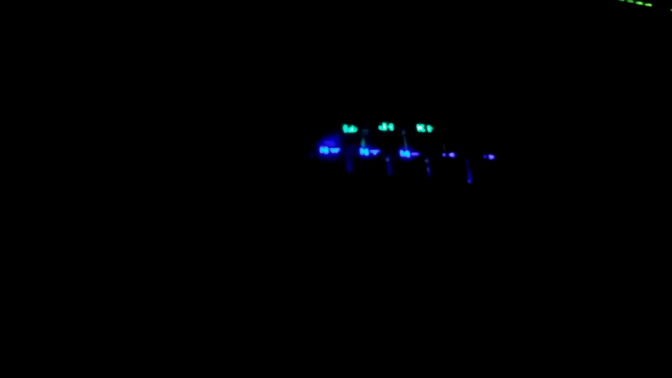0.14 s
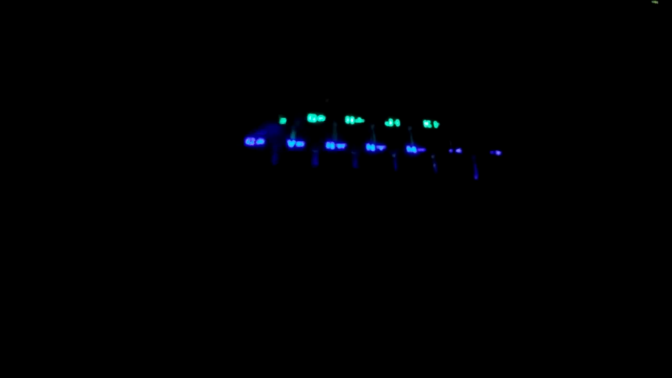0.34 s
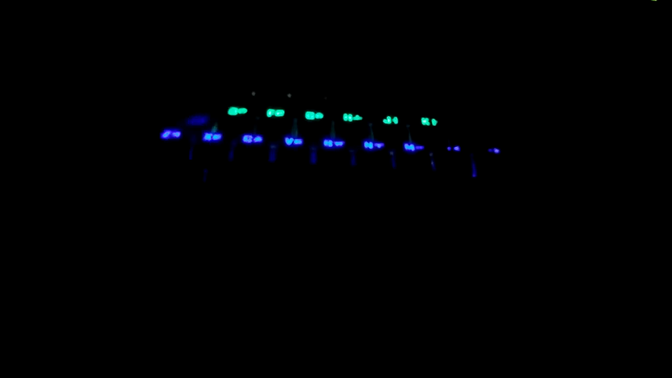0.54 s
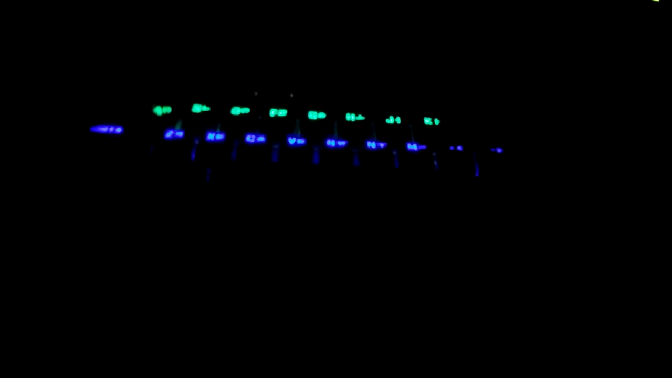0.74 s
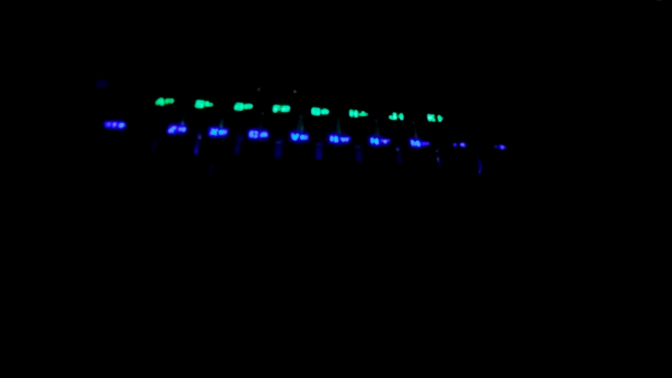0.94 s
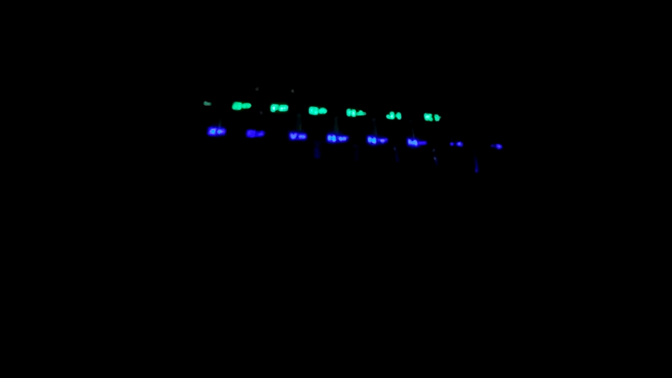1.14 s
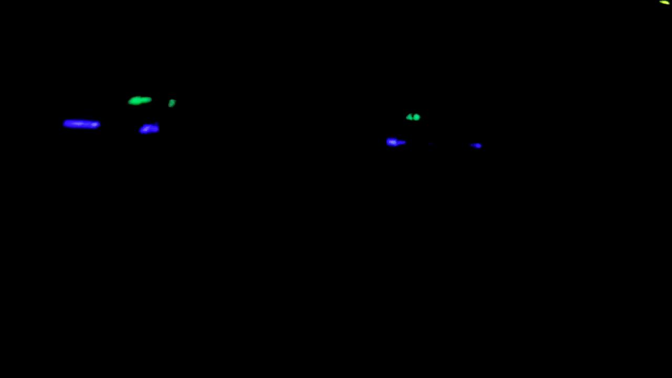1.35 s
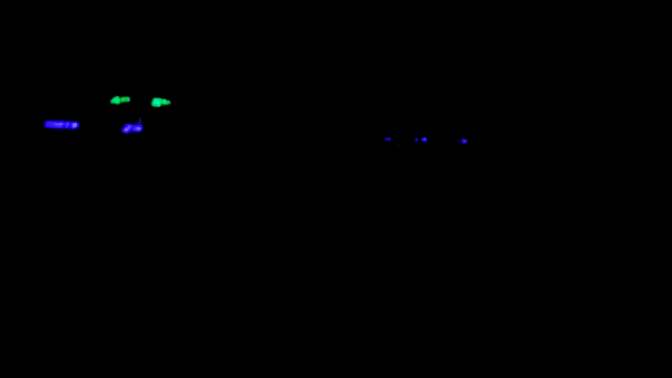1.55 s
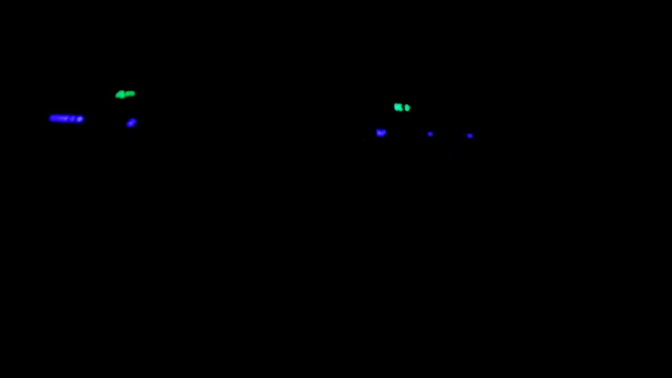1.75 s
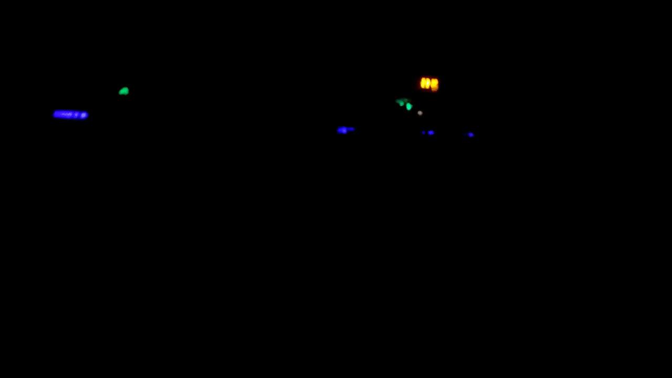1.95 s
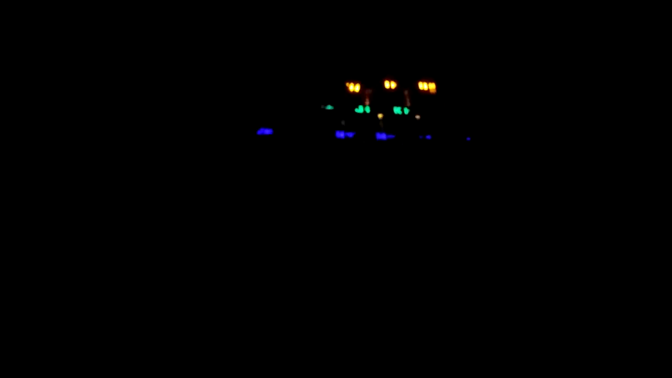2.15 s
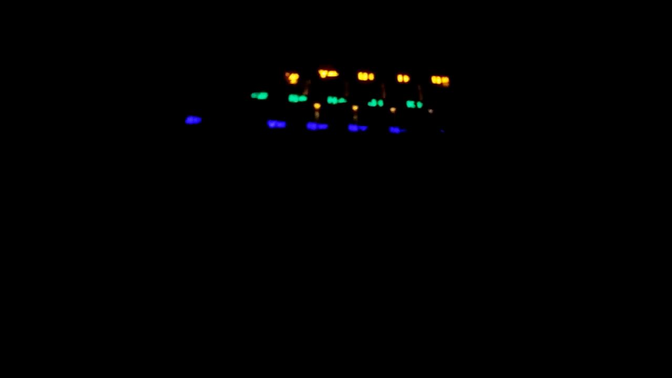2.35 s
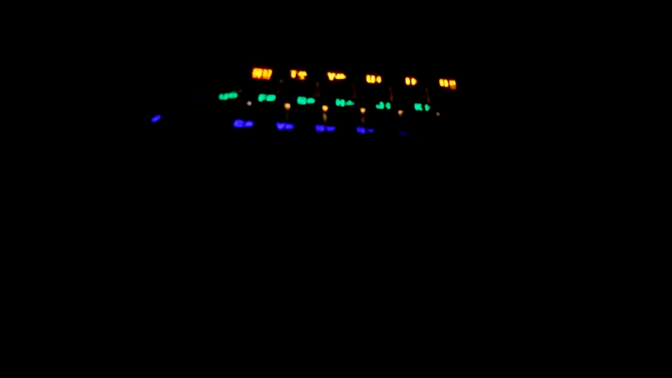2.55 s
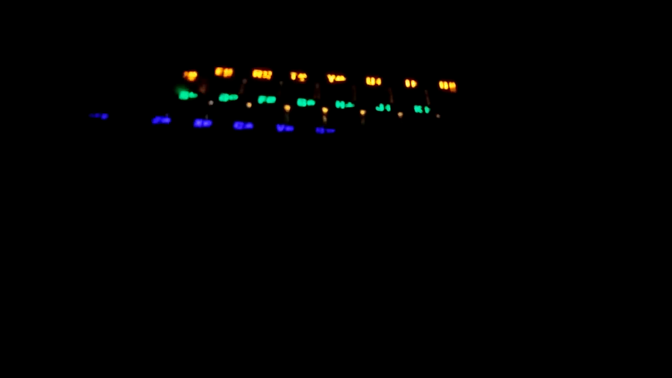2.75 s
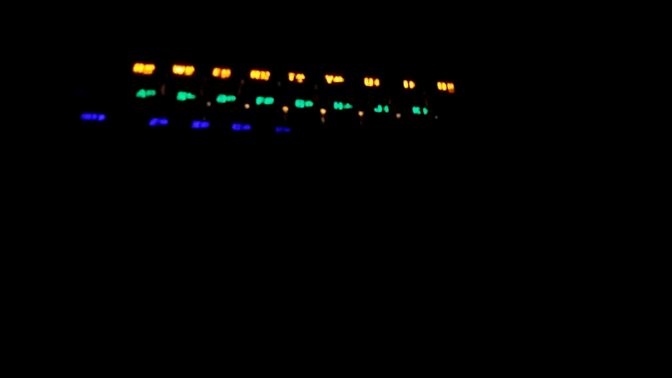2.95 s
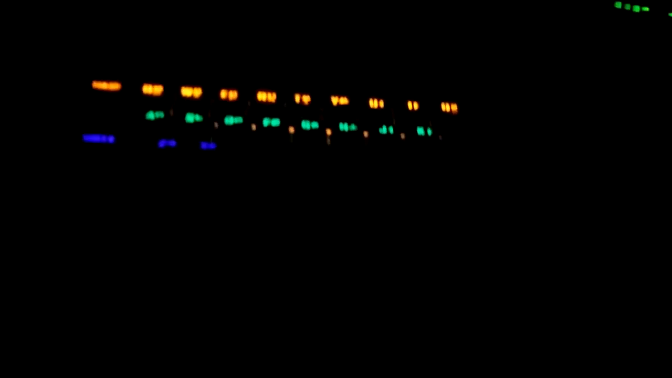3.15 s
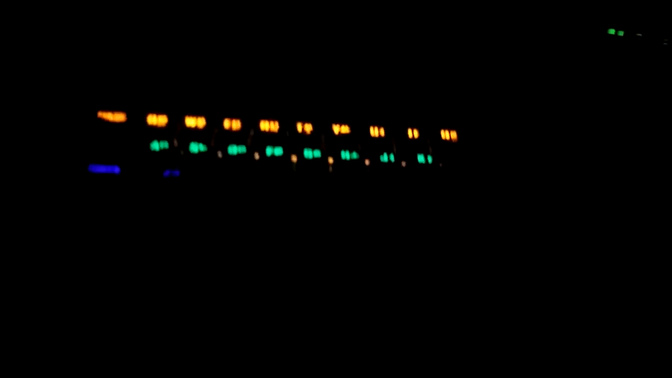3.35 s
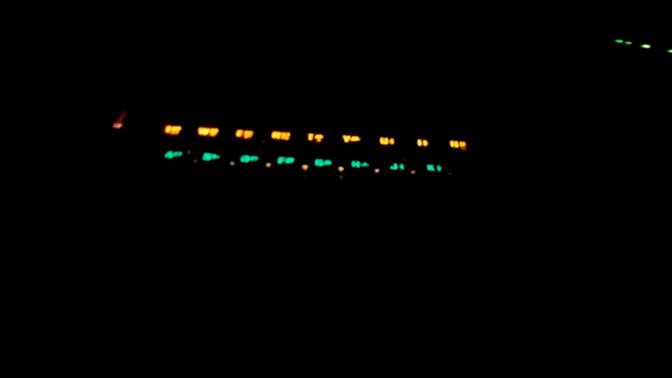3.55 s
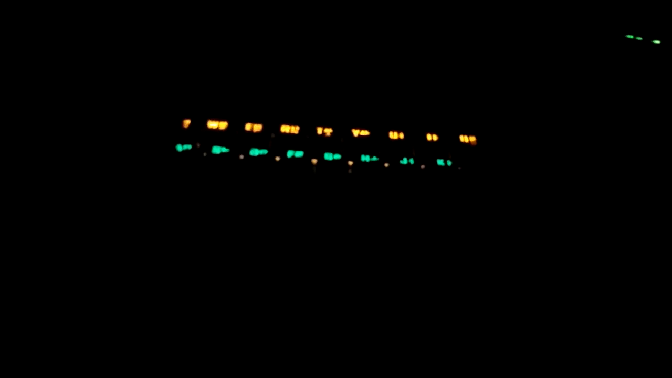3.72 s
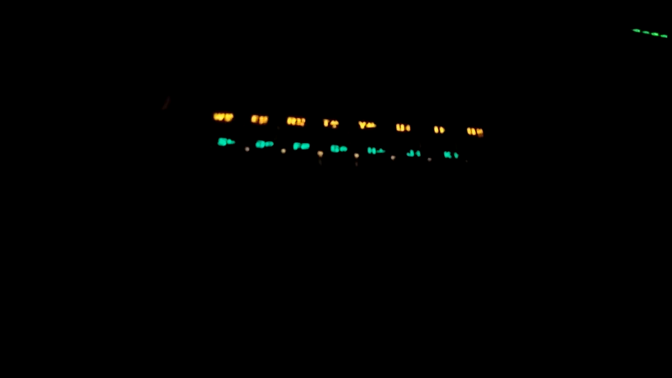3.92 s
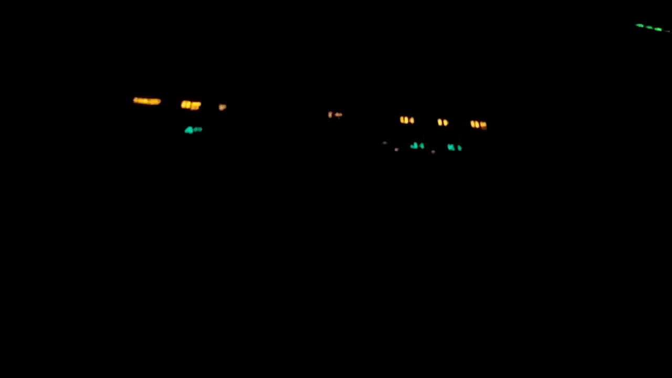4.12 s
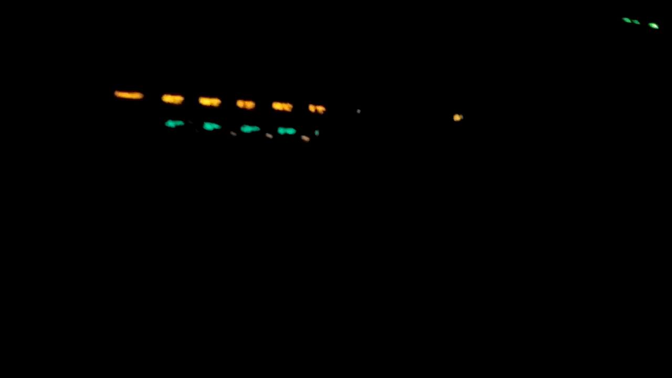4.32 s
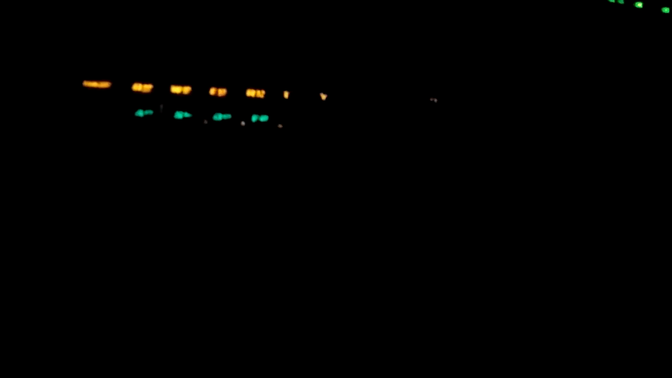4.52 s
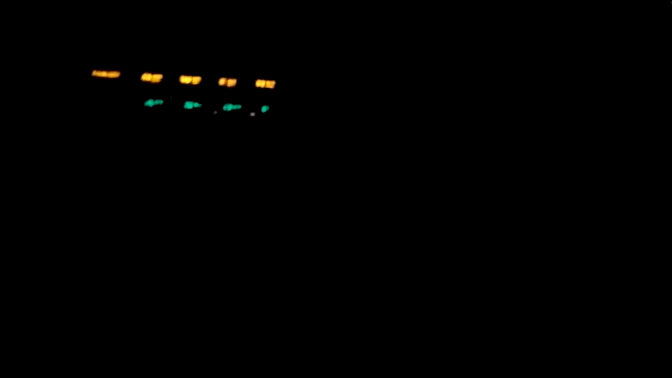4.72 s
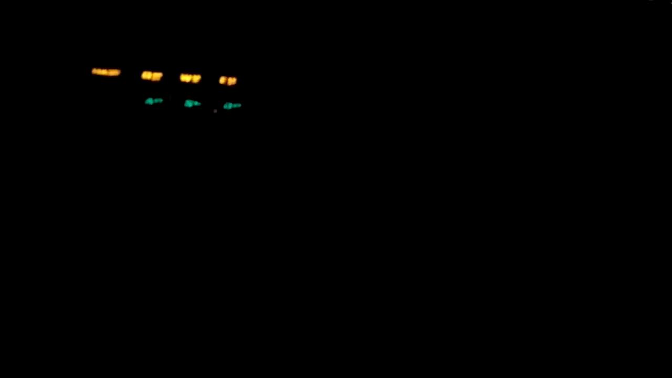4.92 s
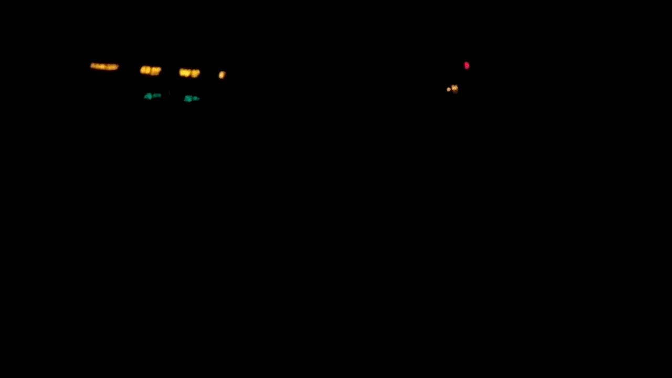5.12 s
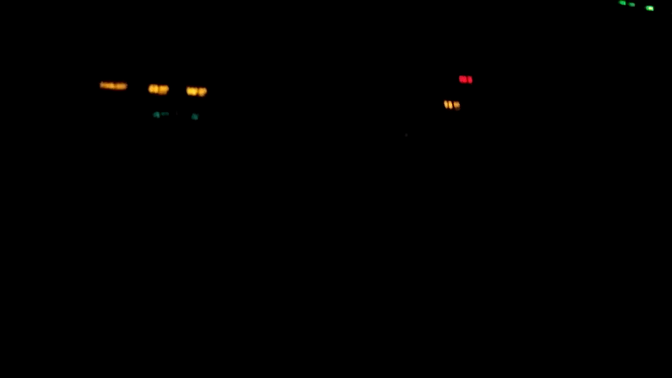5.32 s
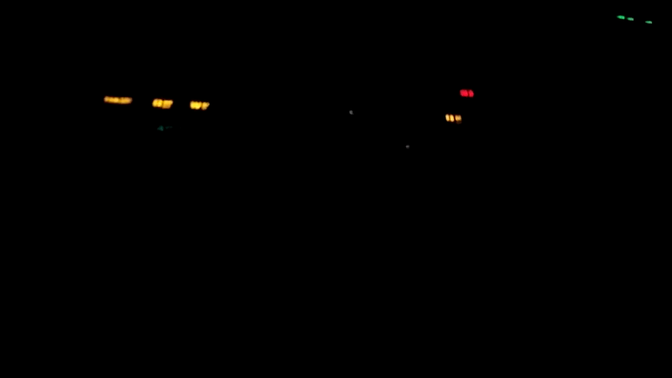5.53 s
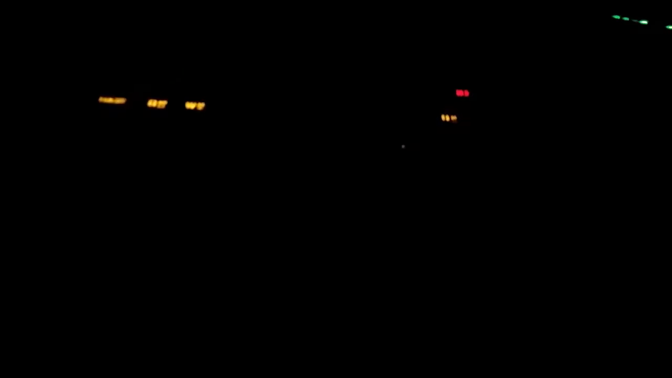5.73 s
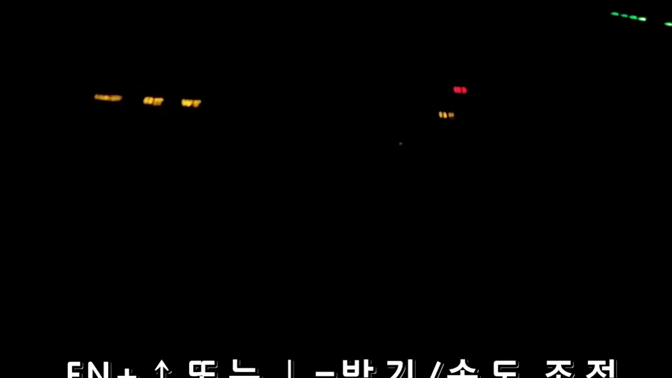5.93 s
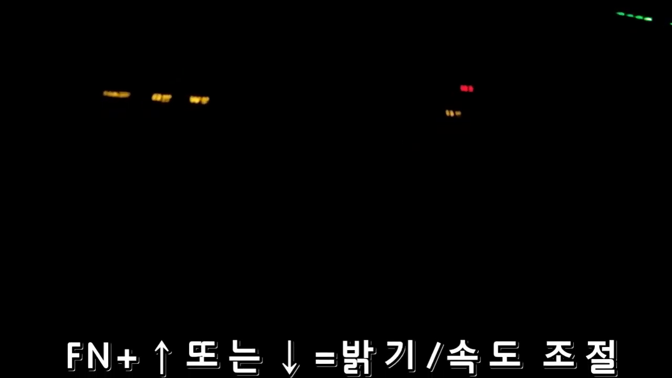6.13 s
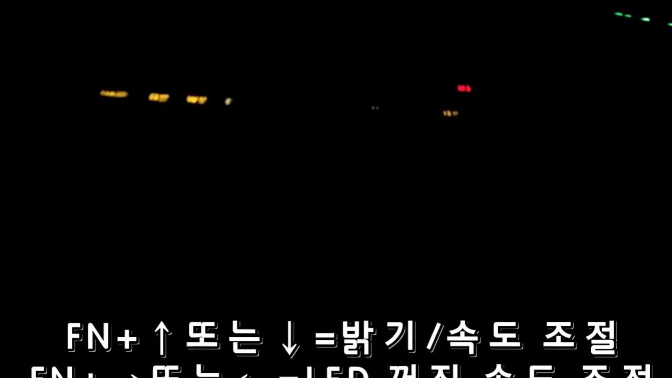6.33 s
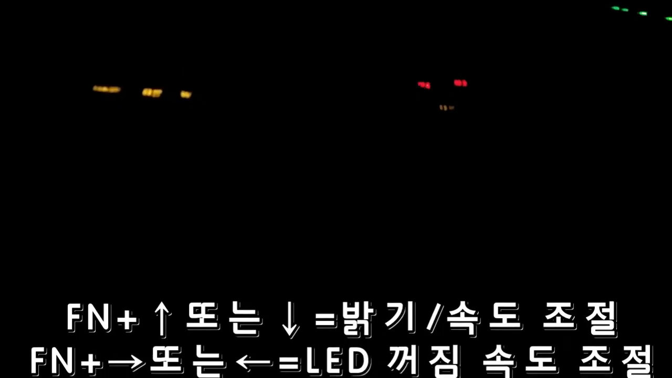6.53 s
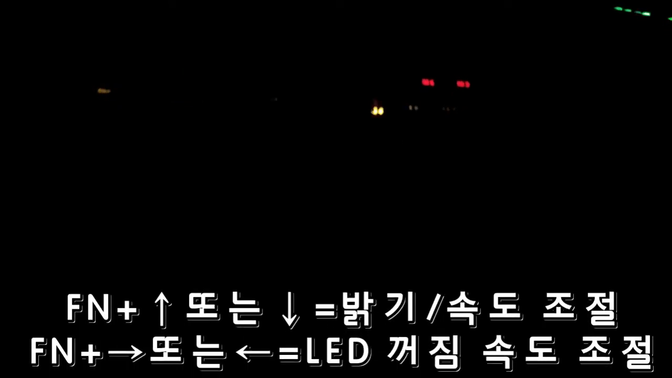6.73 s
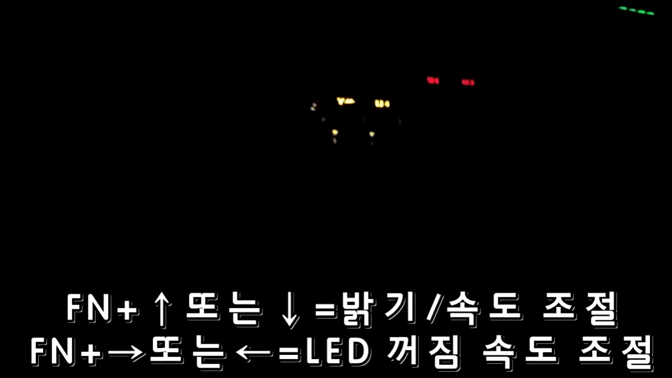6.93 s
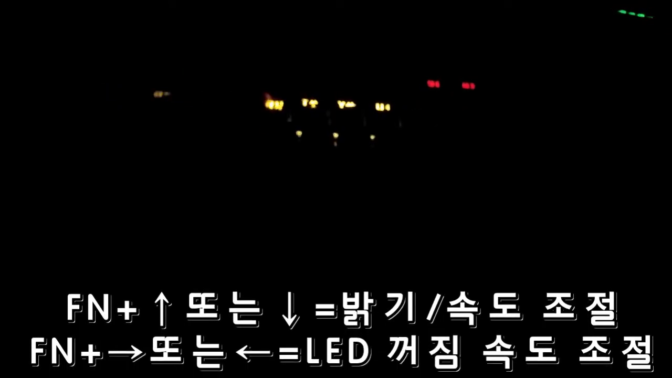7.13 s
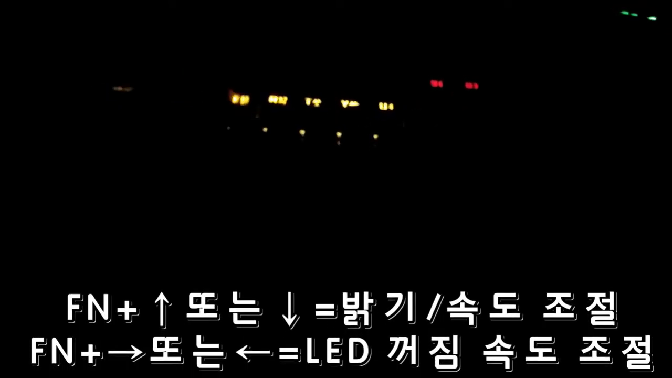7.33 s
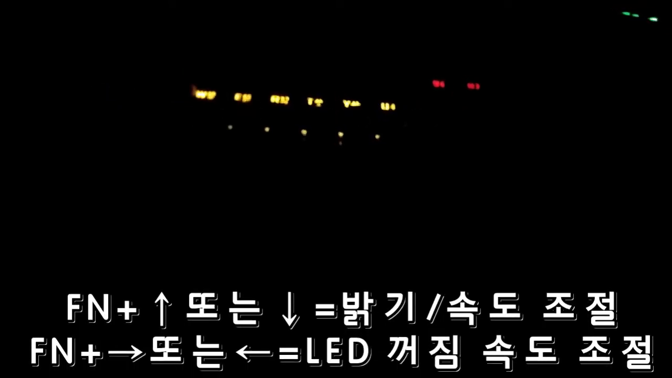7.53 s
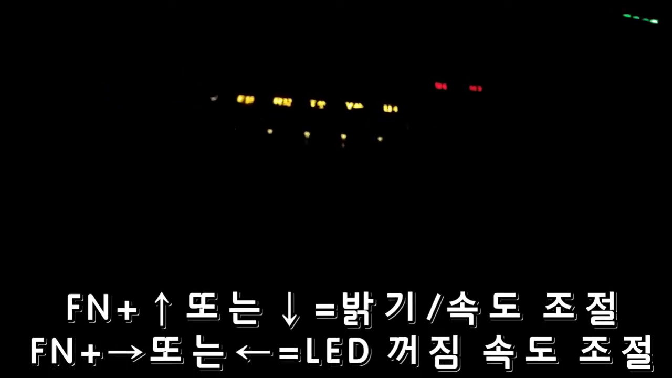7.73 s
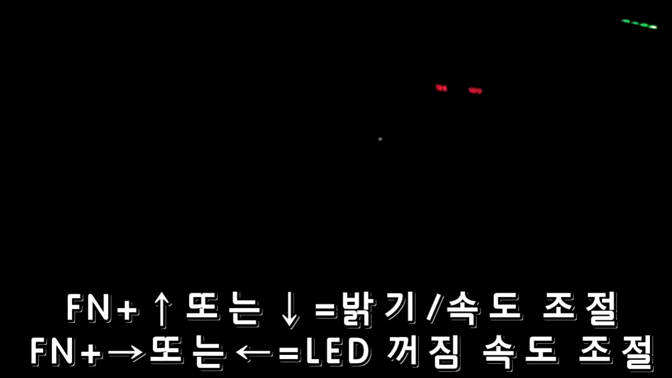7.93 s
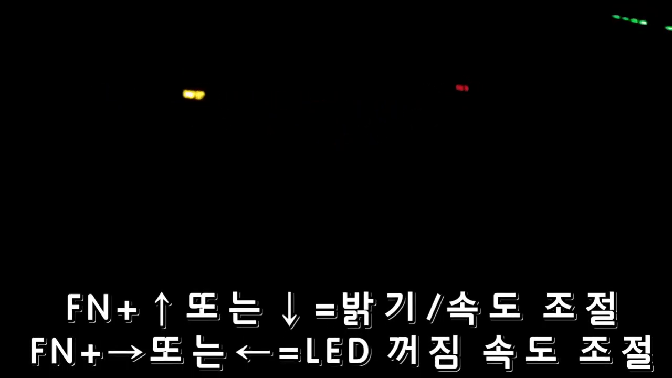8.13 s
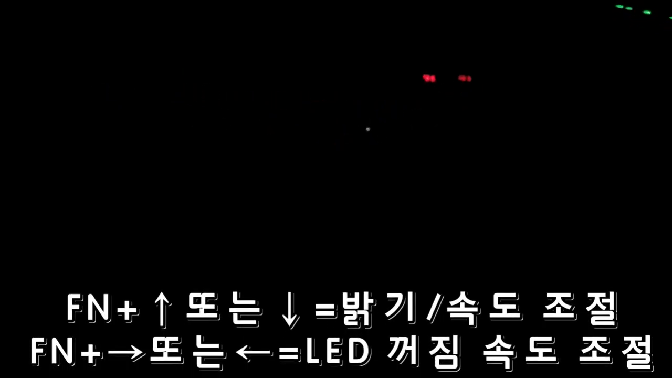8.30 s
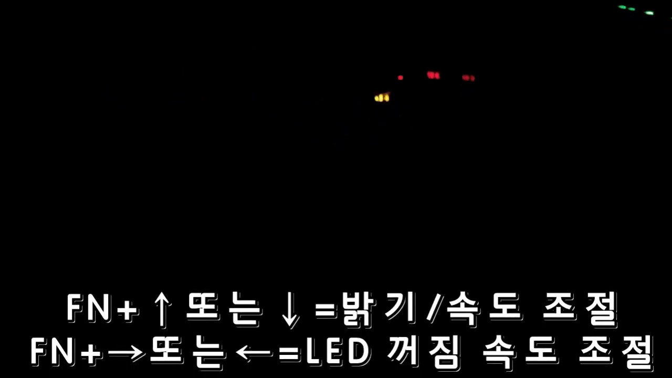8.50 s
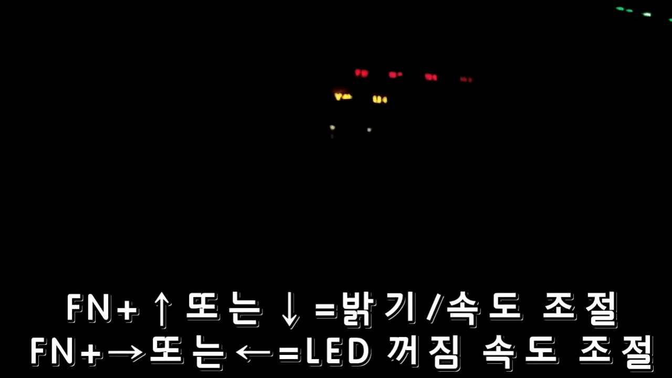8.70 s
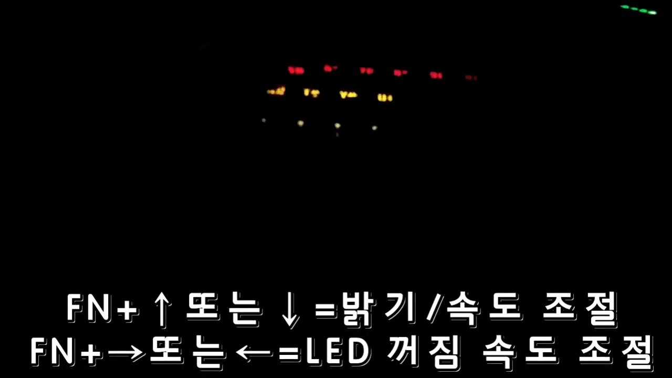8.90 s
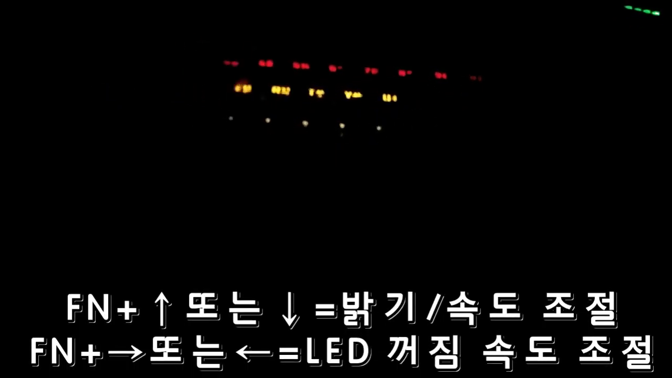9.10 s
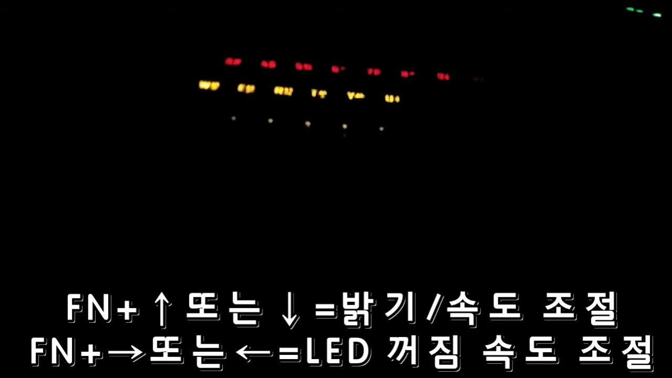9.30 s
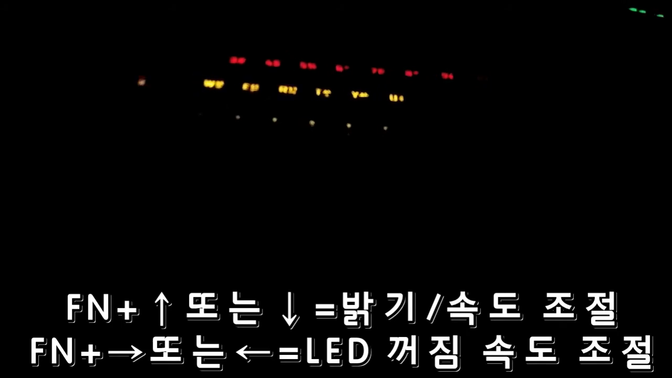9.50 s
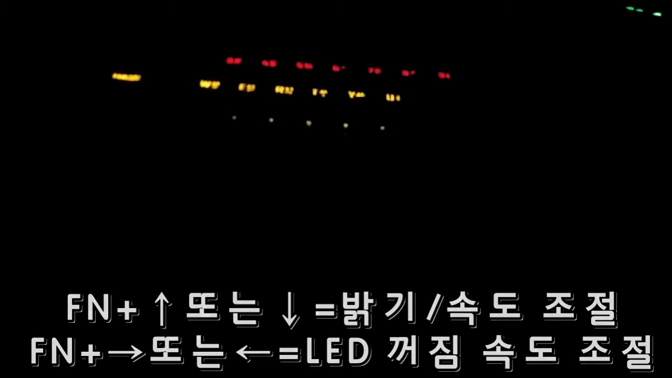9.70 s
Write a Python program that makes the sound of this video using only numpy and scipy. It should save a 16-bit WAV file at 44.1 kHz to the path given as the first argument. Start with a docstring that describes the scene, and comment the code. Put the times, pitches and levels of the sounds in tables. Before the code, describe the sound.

Close, bright clicks of a mechanical keyboard come in runs with lighter taps between, while a fan hums softly in a small room.

```python
"""A small room, the microphone close to a mechanical keyboard whose clicky keys are pressed one by one.
Each switch snaps its click jacket with a bright ring; stems and caps knock into the plastic case,
and loose caps tick under the fingertips. Desk and walls answer with a short tail.
Behind the keys a computer fan hums its blade tone over air noise and a low electrical hum,
and the electronics whine faintly."""
import sys
import numpy as np
from scipy import signal
from scipy.fft import rfft, irfft
from scipy.io import wavfile
from scipy.ndimage import uniform_filter1d

SR = 44100
rng = np.random.default_rng(int(sys.argv[2]) if len(sys.argv) > 2 else 0)


def waveform_to_disk(signal):
    """Save audio, clipped to [-1, 1], as 16-bit WAV at the path in sys.argv[1]."""
    frames = np.transpose(np.atleast_2d(signal))
    scaled = np.clip(frames, -1, 1) * 32767
    samples = np.round(scaled).astype(np.int16)
    wavfile.write(sys.argv[1], SR, samples)


N = 434826


def undb(db):
    return 10 ** (np.asarray(db) / 20)


def level(x, rms_db=0):
    return x * undb(rms_db) / np.sqrt(np.mean(x ** 2))


def fade(t, t60):
    return np.exp(-np.log(1000) * t / max(t60, 1e-4))


def band(x, hz, width):
    """Two-pole resonance, gain 1 at the centre."""
    return signal.lfilter(*signal.iirpeak(hz, hz / width, fs=SR), x)


def walk(rate):
    """Random levels held 1 / rate s and smoothed twice; spread near 1."""
    hold = int(SR / rate)
    steps = np.repeat(rng.standard_normal(N // hold + 1), hold)
    return 1.63 * uniform_filter1d(uniform_filter1d(steps, hold), hold)[:N]


def add(out, start_s, sound, peak_db):
    """Lays a sound in at its time, scaled to its peak."""
    i = int(start_s * SR)
    piece = sound[:N - i]
    out[i:i + len(piece)] += piece * undb(peak_db) / np.abs(sound).max()


# Spectrum of the fan's rushing air: frequency_hz, relative_db
AIR_SPECTRUM = [(30, -41), (105, -32.5), (150, -45), (165, -16), (270, -16), (460, -13), (620, -17.5),
                (970, -13), (2000, -22), (2300, -21.5), (3500, -28), (5300, -34), (9500, -38),
                (16000, -39.5)]
# Low electrical hum (first two rows) and narrow bands of background noise: centre_hz, width_hz, rms_db
HUM_AND_BANDS = [(123, 9.8, -80.5), (176.8, 6.7, -68), (219.3, 14, -66.5), (267.8, 27, -60), (432, 23, -94),
                 (1254, 12, -68.5), (1930, 200, -66), (6900, 310, -78.5)]
# Partials of the blade tone: harmonic, rms_db
BLADE_PARTIALS = [(1, -51.5), (2, -62.5), (4, -70.5), (6, -78.5), (9, -82)]


def fan_and_hum(blade_hz=492.6, air_db=-53):
    """Behind the keys, air, hum and background noise swell gently under the fan's wavering blade tone."""
    bins_hz = np.maximum(np.arange(N // 2 + 1) * SR / N, 1)
    air_hz, shape_db = np.transpose(AIR_SPECTRUM)
    shape = undb(np.interp(np.log(bins_hz), np.log(air_hz), shape_db))
    air = level(irfft(rfft(rng.standard_normal(N)) * shape, N), air_db)
    hum_and_bands = sum(level(band(band(rng.standard_normal(N), hz, width), hz, width), db)
                        for hz, width, db in HUM_AND_BANDS)
    phase = 2 * np.pi * np.cumsum(blade_hz * (1 + 0.00126 * walk(3))) / SR
    blades = sum(np.sqrt(2) * undb(db + 0.71 * walk(6.3)) * np.sin(k * phase) for k, db in BLADE_PARTIALS)
    return (air + hum_and_bands) * undb(.6 * walk(2.5)) + blades


# Partials of the electronics' whine: harmonic, rms_db
WHINE_PARTIALS = [(3, -84), (4, -76.5), (5, -85), (6, -94)]


def whine(base_hz=2381.2):
    """The electronics hold thin, steady tones, faint at the microphone."""
    t = np.arange(N) / SR
    return sum(np.sqrt(2) * undb(db + 0.5 * walk(7.8)) * np.sin(2 * np.pi * k * base_hz * t)
               for k, db in WHINE_PARTIALS)


def chatter(noise, rattle_db, rise_s):
    """A first contact, then the loose part chattering for some milliseconds."""
    t = np.arange(len(noise)) / SR
    blows = undb(rattle_db) * noise * t / rise_s * np.exp(-t / rise_s)
    blows[0] = 1
    return blows


# Modes of a click jacket: pitch_ratio, relative_db, t60_s
JACKET_MODES = [(0.899, -7, 0.015), (1.001, 3.5, 0.012), (1.072, -9.5, 0.013), (1.6, -24, .012)]
# Click jackets snapping close to the microphone: start_s, peak_db, pitch_hz, crack_db
JACKET_SNAPS = [(0.0094, -27, 8270, -2), (0.025, -13.5, 7700, -5.5), (0.078, -19.5, 6840, 2),
                (0.131, -19.5, 8220, -6), (0.1415, -17, 7190, -2), (0.2069, -33, 7900, -9),
                (0.2332, -24, 7860, -7), (0.245, -16, 8040, -8), (0.3535, -26, 8700, -8),
                (0.3704, -9.5, 8360, -18), (0.4773, -29, 8100, 0), (0.4949, -13.5, 8220, -14.5),
                (0.5864, -30, 8170, 0), (0.597, -14, 8230, -6), (0.6977, -33.5, 8170, -2),
                (0.7243, -13, 8770, -14), (0.799, -35.5, 8160, 12), (0.832, -36, 7600, -5),
                (1.8227, -12.5, 8440, -13), (1.844, -15.5, 8030, -11.5), (1.9956, -13, 7420, -4),
                (2.1259, -10.5, 7990, -3), (2.2368, -12, 7300, -2), (2.332, -24.5, 7010, -4),
                (2.3405, -15, 8700, -6), (2.448, -12, 7300, 0), (2.597, -12, 8000, -1),
                (2.7467, -12.5, 7650, -4), (2.885, -32.5, 8100, -3), (2.9023, -13.5, 8600, -12),
                (2.9987, -34, 8200, -1), (3.0623, -17, 7700, -7.5), (6.427, -20, 8040, -3),
                (6.6386, -17, 8940, -2), (6.7237, -14, 7850, -6), (6.823, -29.5, 8310, -5),
                (6.8433, -16.5, 7450, -8.5), (6.9565, -11.5, 8580, -22), (6.967, -17.5, 8300, -13),
                (7.0776, -31, 7300, -10), (7.0893, -13, 7820, -7), (7.2277, -32, 7250, -2),
                (7.2418, -15.5, 8560, -8), (7.393, -39, 8320, 6), (7.442, -10.5, 7750, -18),
                (8.4317, -32, 7060, 2), (8.4382, -19, 8610, -4), (8.6228, -30, 8600, 2),
                (8.629, -18, 8000, 7), (8.7473, -17.5, 7840, 18), (8.861, -24.5, 8690, 8),
                (8.8712, -26, 8490, 10), (8.994, -32, 8300, 6), (9.0032, -21, 8680, 6),
                (9.1313, -13.5, 6800, 8), (9.2542, -20.5, 6730, 12), (9.3723, -18.5, 6510, 7),
                (9.499, -17, 7380, -4), (9.6705, -31, 6610, -13), (9.6797, -14.5, 6670, 5)]


def jacket_snaps(resonance_hz=8300):
    """A jacket cracks and rings; its rough after-ring is drawn towards a fixed bright resonance."""
    out, t = np.zeros(N), np.arange(8192) / SR
    for start_s, peak_db, pitch_hz, crack_db in JACKET_SNAPS:
        scatter, noise = rng.standard_normal((len(JACKET_MODES), 2)), rng.standard_normal((3, len(t)))
        ring = sum(undb(db + 3.5 * louder) * fade(t, t60)
                   * np.sin(2 * np.pi * pitch_hz * ratio * (1 + .008 * detune) * t)
                   for (ratio, db, t60), (louder, detune) in zip(JACKET_MODES, scatter))
        crack = level(band(band(noise[0], 5400, 8900), 3900, 12000), crack_db)
        crack *= fade(t, 0.023) + 0.11 * fade(t, 0.28)
        # the after-ring grows with the crack, and as the jacket's pitch nears the resonance
        after_db = -4.5 + 0.69 * crack_db - 32 * abs(np.log2(pitch_hz / resonance_hz))
        after_hz = np.sqrt(pitch_hz * resonance_hz)
        after_ring = level(band(band(noise[1], after_hz, 1300), after_hz, 2800), after_db)
        after_ring *= fade(t, 0.16) * (1 - fade(t, 0.0073))
        blows = chatter(noise[2], rattle_db=-26 - 0.35 * peak_db, rise_s=0.0016)  # faint snaps are looser
        add(out, start_s, signal.fftconvolve(blows, ring + crack + after_ring)[:len(t)], peak_db)
    return out


# Modes of the plastic case: pitch_hz, relative_db
CASE_MODES = [(400, -19.5), (528, -11), (662, -11.5), (845, -4.5), (955, -4), (1060, -6.5), (1282, -3),
              (1435, -3), (1670, -4), (1870, -40), (2025, -2), (2220, -14), (2530, -1.5), (2780, 2),
              (2950, -11.5), (3290, -5.5), (3590, -20)]


def case_ring(t, spot_hz):
    """The struck spot favours the case modes near its pitch; higher modes lose their energy sooner."""
    hz, db = np.transpose(CASE_MODES)
    louder, detune = rng.standard_normal((len(hz), 2)).T
    gains = undb(db + 2.56 * louder - 6.0 * np.abs(np.log2(hz / spot_hz)))
    t60s = 0.054 * (1000 / hz) ** 1.27
    return sum((-1) ** k * gain * np.sin(2 * np.pi * mode_hz * t) * fade(t, t60)
               for k, (gain, mode_hz, t60) in enumerate(zip(gains, hz * (1 + 0.0058 * detune), t60s)))


def cap_clack(t, noise, clack_db):
    """The cap itself clacks short and dry, with a rough tail."""
    rough = level(band(band(noise, 2820, 1500), 2200, 2300), clack_db)
    rough *= fade(t, 0.01) + 0.064 * fade(t, 0.031)
    tone = undb(clack_db + 1.0) * np.sin(2 * np.pi * 2900 * t)
    return rough + tone * fade(t, 0.011) * (1 - fade(t, 0.0036))


# Stems and caps knocking the case, close up: start_s, level_db, spot_hz, hardness_db
CASE_KNOCKS = [(0.014, -26, 1280, -3), (0.032, -21, 1320, -2), (0.076, -16, 1360, 5),
               (0.134, -18.5, 885, -5), (0.145, -17, 1280, -4), (0.174, -28, 1370, 14),
               (0.236, -18.5, 1300, -6), (0.254, -18, 870, 12), (0.357, -23, 1290, 5.5),
               (0.375, -18.5, 880, 5.5), (0.486, -20.5, 980, 3), (0.498, -22, 1100, 6.5),
               (0.528, -29, 1430, 1), (0.589, -26.5, 1060, -15), (0.605, -20, 1210, 3.5),
               (0.631, -29, 1220, 1), (0.702, -20, 1400, 4), (0.723, -32, 880, 3), (0.803, -35, 1600, 1),
               (0.836, -24.5, 1320, -2), (0.874, -35.5, 945, -11), (1.844, -36, 1600, -6),
               (1.995, -10, 825, 2.5), (2.128, -6.5, 1320, 3.5), (2.185, -31, 1260, 6),
               (2.237, -9, 1270, 1.5), (2.335, -17.5, 1050, -16), (2.377, -32, 1440, -3),
               (2.453, -6.5, 1410, 3), (2.599, -8, 980, 3.5), (2.659, -29.5, 1420, -3),
               (2.748, -11, 970, 4.5), (2.81, -24.5, 970, -1), (2.888, -24.5, 1540, -12),
               (2.965, -29, 1050, 1), (3.002, -31, 1380, 2), (3.062, -33, 2970, 0), (3.113, -27, 1000, -26),
               (3.666, -39.5, 1690, -3), (3.808, -39, 1060, -2), (4.015, -27, 1290, -4),
               (4.042, -34.5, 1440, -2), (4.245, -28.5, 1370, -3), (4.264, -25.5, 1460, 2),
               (4.293, -27.5, 1370, -3), (4.324, -25, 1620, -10), (4.361, -34, 1660, -2),
               (5.044, -38.5, 1270, -1), (5.258, -26, 1570, -14), (6.637, -3.5, 890, 7.5),
               (6.679, -26, 1690, -11), (6.713, -26.5, 1290, 1), (6.754, -29, 1310, -15),
               (6.825, -19, 1340, 2), (6.94, -21, 1330, 2), (6.967, -31.5, 1400, -15),
               (7.078, -21.5, 1440, 0.5), (7.099, -21.5, 865, 8.5), (7.133, -36, 1080, -8),
               (7.23, -23, 1420, -1), (7.287, -32.5, 890, -12), (7.404, -29, 1420, 3.5),
               (7.484, -35, 990, -11), (7.579, -35, 977, -6), (7.683, -37.5, 1060, -2),
               (8.06, -39, 1150, -11), (8.324, -37, 851, 1), (8.438, -19.5, 1200, -8),
               (8.469, -33, 1140, -5), (8.625, -7.5, 2860, -10), (8.687, -35, 1360, -5),
               (8.746, -12, 1000, 3), (8.844, -34, 1430, -8), (8.864, -14, 1320, 1), (8.889, -33, 853, -3),
               (8.995, -25, 875, -1), (9.072, -35, 877, 1), (9.133, -14, 960, 3), (9.181, -28, 880, -4),
               (9.221, -31, 950, -6), (9.254, -10, 970, 5), (9.309, -29, 1550, -6), (9.373, -18, 1360, 5),
               (9.418, -27.5, 850, -5), (9.68, -11, 1070, -7)]


def case_knocks():
    """A key's blow and its rattle sound the case, the hollow under the cap and the cap itself."""
    out, t = np.zeros(N), np.arange(4096) / SR
    delay_s = .0007  # each knock sounds 0.7 ms after its listed time
    for start_s, level_db, spot_hz, hardness_db in CASE_KNOCKS:
        modes = case_ring(t, spot_hz)
        noise = rng.standard_normal((3, len(t)))
        dense_modes = 0.89 * level(band(band(noise[0], 1800, 1520), 785, 4000))
        dense_modes *= fade(t, 0.027) + 0.13 * fade(t, 0.063)
        hollow_db = -14 - 0.5 * hardness_db - 0.34 * level_db  # soft, light landings sound it more
        hollow = level(band(band(noise[0], spot_hz, 150), spot_hz, 740), hollow_db) * fade(t, 0.048)
        # bending waves need a moment to spread over the board
        board = (modes + dense_modes + hollow) * (1 - fade(t, 0.0036))
        # heavy blows clack more; light touches rattle relatively more
        clack = cap_clack(t, noise[2], clack_db=-2 + 0.11 * level_db)
        blows = chatter(noise[1], rattle_db=-23 - 0.097 * level_db, rise_s=0.0041)
        # a harder contact is shorter and feeds the upper modes
        treble = signal.lfilter(*signal.butter(2, 1900, "high", fs=SR), blows)
        blows += (undb(hardness_db) - 1) * treble
        add(out, start_s + delay_s, signal.fftconvolve(blows, board + clack)[:len(t)], level_db)
    # plastic on plastic stays rounded
    return signal.sosfilt(signal.butter(2, 4200, fs=SR, output="sos"), out)


# Loose caps ticking under the fingertips: start_s, peak_db
CAP_TICKS = [(0.078, -24), (0.194, -38), (0.302, -41), (2.186, -30), (2.838, -38), (4.015, -42),
             (4.04, -47), (4.2434, -35), (4.2707, -35), (4.291, -32.5), (4.321, -33.5), (4.361, -44),
             (5.0145, -46), (5.042, -47), (5.2385, -46), (5.256, -42), (9.22, -33)]


def cap_ticks():
    """A loose cap gives a dry, broad tick with a little chatter and no ring."""
    out, t = np.zeros(N), np.arange(2048) / SR
    for start_s, peak_db in CAP_TICKS:
        noise = rng.standard_normal((2, len(t)))
        tick = band(noise[0], 4000, 7500) * fade(t, .012)
        blows = chatter(noise[1], rattle_db=-15.5, rise_s=0.0038)
        add(out, start_s, signal.fftconvolve(blows, tick)[:len(t)], peak_db)
    return out


def room(keys, t60_s=0.26, level_db=-14.5, treble_hz=6900):
    """Desk and walls answer with a dense, short tail, well below the direct sound this close."""
    t = np.arange(16384) / SR
    dull_noise = signal.lfilter(*signal.butter(1, treble_hz, fs=SR), rng.standard_normal(len(t)))
    tail = dull_noise * fade(t, t60_s) * (1 - fade(t, 0.015))
    return undb(level_db) * signal.fftconvolve(keys, tail / np.sqrt(np.sum(tail ** 2)))[:N]


def scene():
    """At the desk, in mono: keys up close, with room, fan, hum and whine behind them."""
    keys = jacket_snaps() + case_knocks() + cap_ticks()
    # a small board radiates little bass
    keys = signal.sosfilt(signal.butter(3, 330, "high", fs=SR, output="sos"), keys)
    return (keys + room(keys) + fan_and_hum() + whine())[None]


def record(dry):
    """The microphone has a dip in the lower treble; the recorder cuts the top steeply."""
    dip_depth, top_hz = 0.34, 15900
    heard = dry - dip_depth * band(dry, hz=5610, width=980)
    return signal.sosfilt(signal.ellip(10, .2, 70, top_hz, fs=SR, output="sos"), heard)


dry = scene()
out = record(dry)
waveform_to_disk(out)
```